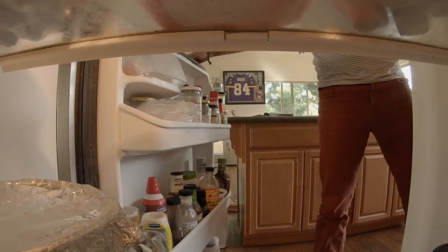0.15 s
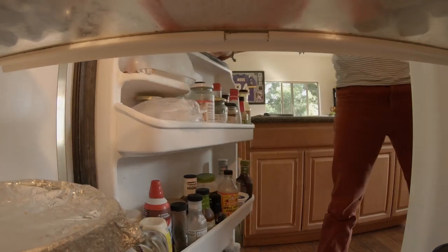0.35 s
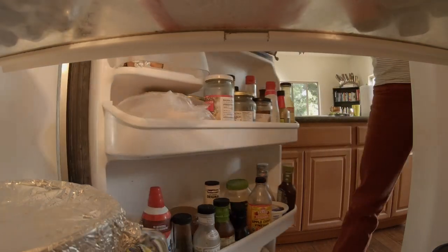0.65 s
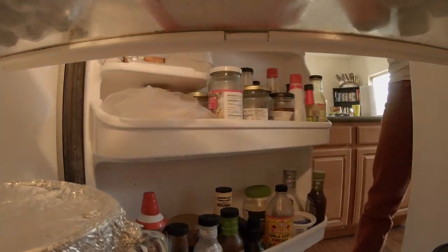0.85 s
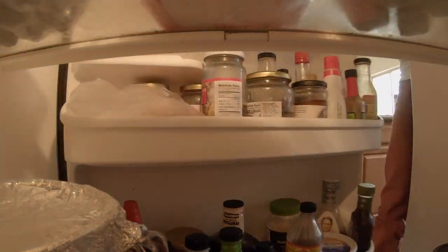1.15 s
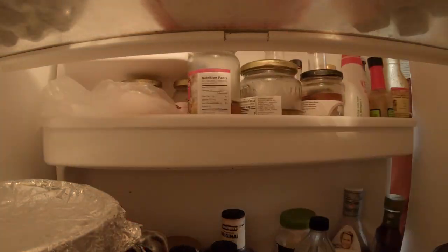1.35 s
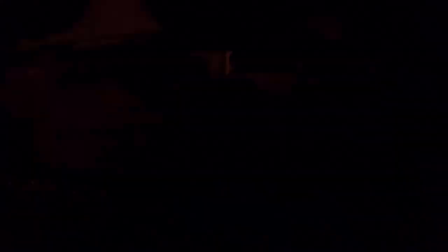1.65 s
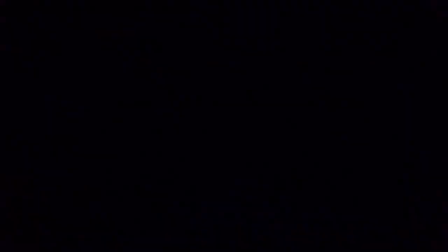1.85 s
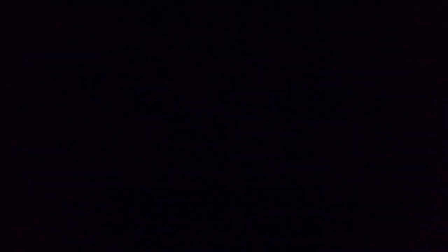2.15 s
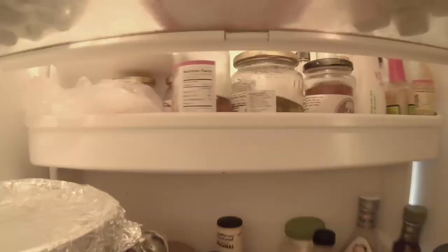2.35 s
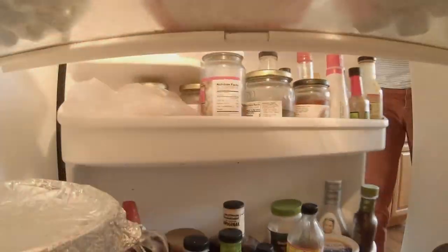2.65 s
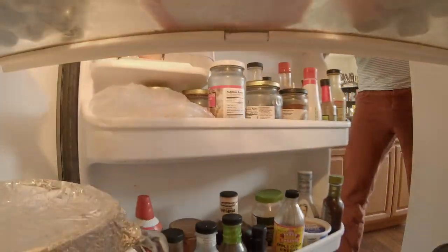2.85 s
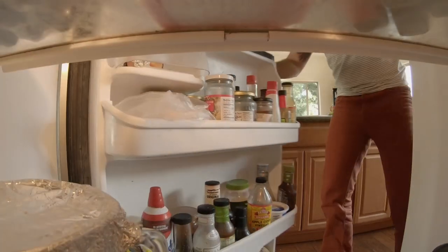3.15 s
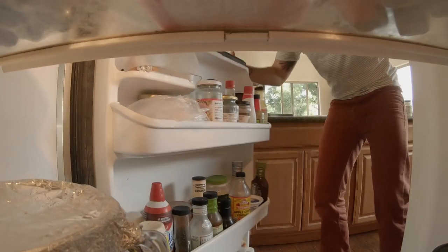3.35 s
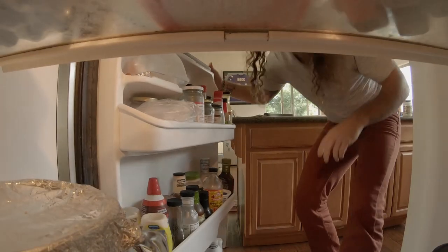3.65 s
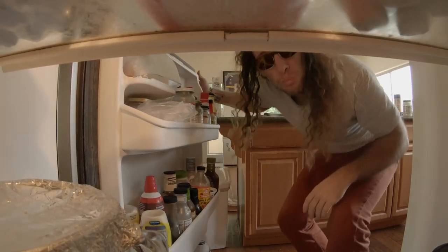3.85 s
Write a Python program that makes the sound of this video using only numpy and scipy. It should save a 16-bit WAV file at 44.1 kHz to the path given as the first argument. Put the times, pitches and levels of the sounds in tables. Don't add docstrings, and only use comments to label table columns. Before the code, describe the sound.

A refrigerator door slams shut with a thump and rattling jars, over a low fridge hum.

```python
import sys
import numpy as np
from scipy import signal
from scipy.io import wavfile
from scipy.ndimage import uniform_filter1d

SR = 44100
rng = np.random.default_rng(int(sys.argv[2]) if len(sys.argv) > 2 else 0)


def boost_factor(decibels):
    exponent = np.asarray(decibels, float) / 20
    return 10 ** exponent


def file_out(sig):
    cols = np.atleast_2d(sig).T
    lim = np.clip(cols, -1, 1)
    pcm = np.round(lim * 32767).astype(np.int16)
    wavfile.write(sys.argv[1], SR, pcm)


N = 176400
T = np.arange(N) / SR

# time in seconds, level in dB, wind mode share from 0 to 1.
AIR = [
    (0, 0, 0.08),
    (.8, 0.5, 0.07),
    (1.5, 0.5, 0.15),
    (1.9, 6.5, 0),
    (2.12, -9.5, 0.26),
    (2.45, -7.5, 0.73),
    (2.75, -4, 0.96),
    (3.45, -2.5, 1),
    (4, -3, 0.74),
]


def evened(x):
    return x / np.sqrt(np.mean(x ** 2) + 1e-20)


def read(points, hz):
    f, value = np.transpose(points)
    return np.interp(np.log(hz + 1), np.log(f + 1), value)


def curve(table, t, index):
    times = [row[0] for row in table]
    return np.interp(t, times, [row[index] for row in table])


def drift(rate):
    speeds = np.geomspace(rate / 10, rate, num=12)
    return evened(sum(np.sin(2 * np.pi * (f * T + rng.random())) for f in speeds))


def port_noise(size, field_db):
    # frequency in Hz, likeness from 0 to 1.
    likeness = [(60, .7), (130, .95), (300, .93), (700, .6), (1400, .55), (3100, .66), (6000, .12)]
    # frequency in Hz, lead in radians.
    left_lead = [(60, .3), (340, .1), (950, 1.4), (1460, .9), (1980, 2.0), (2330, .2)]
    # frequency in Hz, left over right in dB.
    left_lean = [(50, 2), (110, -1.5), (400, -5), (700, -4), (1300, -1), (2400, 0)]
    hop = size // 4
    frames = N // hop + 5
    hz = np.fft.rfftfreq(size, 1 / SR)
    a, b, c, d = rng.standard_normal((frames, len(hz), 4)).T
    same = np.clip(read(likeness, hz), 0, 1)[:, None]
    right = a + 1j * b
    left = same * right + np.sqrt(1 - same ** 2) * (c + 1j * d)
    left = left * (boost_factor(read(left_lean, hz)) * np.exp(1j * read(left_lead, hz)))[:, None]
    spectra = np.array([left, right]) * boost_factor(field_db(hz[:, None], np.arange(frames) * hop / SR))
    noise = signal.istft(spectra, nperseg=size, noverlap=size - hop)[1][:, :N]
    return noise * np.sqrt(3 * SR / 2 / size)


def bright_db(hz, t):
    # frequency in Hz, level in dB.
    hand_on_door = [(1500, -15.5), (2300, -1), (2800, -7), (3400, 1.5), (4400, -13.5), (7500, -2.5),
                    (9000, -20), (15000, -39.5)]
    slam = [(500, -24.5), (1500, -7), (2500, -4), (4600, -9.5), (5600, -2.5), (7800, -3), (9500, -18),
            (15500, -38)]
    seal_peel = [(500, -10), (2200, -2.5), (4200, -3), (5200, -5), (8000, -10.5), (9500, -23.5),
                 (15500, -45)]
    clothes = [(2000, -6.5), (4000, 1.5), (8000, -17), (10800, -33), (12500, -16), (15500, -24.5)]
    colours = [read(c, hz) for c in (hand_on_door, slam, seal_peel, clothes)]
    colours = np.hstack([c - 10 * np.log10(np.mean(boost_factor(2 * c))) for c in colours])
    slam_s, peel_s, clothes_s = 1.45, 2.12, 3.3
    return colours[:, np.searchsorted([slam_s, peel_s, clothes_s], t)]


def rattles():
    # start in seconds, bright level in dB, dull part in dB relative to it,
    # hold in seconds, time to fall 60 dB in seconds.
    slam_hits = [(1.5474, -36, 4.5, 0.0067, 0.08), (1.607, -44, -10.5, 0.017, 0.063),
                 (1.622, -33, 4.5, 0.0033, 0.068), (1.6289, -21.5, -6, 0.02, 0.15),
                 (1.686, -39, 8.5, 0.0064, 0.11), (1.7168, -36, 2.5, 0.0066, .15),
                 (1.724, -42.5, 12, .03, 0.1), (1.78, -34.5, -4.5, 0.02, 0.13),
                 (1.824, -39, -6.5, 0.012, 0.066), (1.8425, -32.5, 1, 0.0098, 0.065),
                 (1.867, -36, 1, 0.013, 0.088), (1.907, -45, -13, 0.008, 0.078),
                 (1.928, -39.5, -8, 0.0058, 0.075), (1.9507, -49, -8, 0.005, 0.08),
                 (1.979, -66, 13.5, 0.0095, 0.23), (2.0008, -44, -0.5, 0.0046, 0.047),
                 (2.054, -48, -7.5, 0.00292, 0.052)]
    small_ticks = [
        (1.307, -60.5, -27, 0.0087, 0.082),
        (2.19, -60.5, 2, .022, 0.079),
        (2.2134, -51, -5, 0.0091, .09),
        (2.246, -58.5, 7.5, 0.009, 0.061),
        (2.258, -58.5, 10, 0.014, 0.065),
        (2.2934, -63, 19, 0.011, 0.055),
        (2.5324, -62.5, 9.5, 0.0063, .08),
        (2.801, -71, -18.5, 0.02, 0.15),
        (3.711, -83.5, 24.5, .006, 0.046),
        (3.939, -78.5, 25.5, 0.0087, 0.044),
    ]
    # middle in seconds, level in dB, half length in seconds.
    brushes = [
        (0.858, -57, 0.045),
        (1.491, -71, 0.096),
        (4.0, -67, 0.24),
    ]
    # frequency in Hz, level in dB.
    dull_colour = [(150, -7), (320, 8.5), (800, -0.5), (1600, -5.5), (2900, -14), (4500, -15),
                   (8000, -35.5), (15000, -68)]
    bright = evened(port_noise(512, bright_db))
    dull = evened(port_noise(512, lambda hz, t: read(dull_colour, hz) + 0 * t))
    crackle = boost_factor(1.2 * evened(uniform_filter1d(rng.standard_normal(N), size=90)))
    bright_power, dull_power = np.zeros(N), np.zeros(N)
    for s, db, dull_db, hold, t60 in slam_hits + small_ticks:
        age = np.maximum(T - s, 0)
        fading = np.maximum(age - hold, 0)
        rise = np.minimum(age / (0.001 + 0.3 * hold), 1) ** 2
        bright_power += rise * boost_factor(2 * (db - 60 * fading / t60))
        dull_power += rise * boost_factor(2 * (db + dull_db - 60 * fading / (1.6 * t60)))
    for s, db, half in brushes:
        bright_power += boost_factor(2 * db) * np.exp(-((T - s) / half) ** 2)
    return crackle * (np.sqrt(bright_power) * bright + np.sqrt(dull_power) * dull)


def clinks():
    # start in seconds, level in dB, pitch factor.
    jar_strikes = [
        (1.7448, -29, 1.0),
        (1.7645, -40, 1.0),
    ]
    # frequency in Hz, level in dB.
    jar_modes = [(4064, 0.5), (5825, -1.5), (7176, -8), (7730, 0.5), (9800, -15), (13200, -32.5)]
    # start in seconds, frequency in Hz, level in dB, time to fall 60 dB in seconds.
    panel_rings = [(1.551, 1500, -19.5, 0.057), (1.549, 1910, -26, 0.044), (1.548, 2200, -25, 0.038),
                   (1.552, 2790, -33.5, 0.066), (1.549, 3080, -29, .04), (1.549, 850, -37, 0.064),
                   (1.619, 874, -30.5, 0.14), (1.634, 2144, -22.5, 0.06), (1.639, 1780, -20.5, 0.057),
                   (1.642, 1994, -31.5, 0.061), (1.640, 809, -23, .1), (1.656, 310, -22, 0.087),
                   (1.662, 823, -26.5, 0.077), (1.674, 695, -25, .1), (1.689, 1534, -38.5, 0.069),
                   (1.690, 2725, -31, 0.047), (1.722, 588, -33, 0.11), (1.728, 842, -28.5, 0.15),
                   (1.727, 1380, -36.5, 0.1), (1.728, 314, -25.5, 0.16), (1.746, 2740, -36, 0.077),
                   (1.788, 2770, -35, 0.11), (1.805, 750, -35.5, .12), (1.821, 1153, -42, .2),
                   (1.844, 813, -25, 0.041), (1.844, 315, -20, 0.075), (1.871, 1290, -37, 0.052),
                   (1.870, 676, -37, 0.19), (1.894, 397, -28, 0.062), (1.912, 786, -38, 0.19),
                   (1.981, 715, -36.5, 0.06), (2.001, 425, -31.5, 0.047), (2.002, 750, -45, 0.081),
                   (2.002, 1570, -58, .05), (2.054, 750, -46, .06), (2.2154, 5500, -47.5, .03),
                   (2.2165, 2440, -50, 0.027), (2.2975, 2060, -39.5, 0.035), (2.304, 1260, -45, 0.055),
                   (2.304, 500, -40, .07), (2.806, 6770, -67.5, .06), (1.555, 1650, -27, 0.049)]
    jar_t60_s, rise_s = 0.061, 0.001
    lowest_hz = jar_modes[0][0]
    glass = []
    for s, db, pitch in jar_strikes:
        for hz, mode_db in jar_modes:
            glass.append((s, hz * pitch, db + mode_db, jar_t60_s * np.sqrt(lowest_hz / hz)))
    twins = [(s, hz * 1.035, db - 5, t60) for s, hz, db, t60 in panel_rings]
    out = np.zeros((2, N))
    age = T[:SR // 4]
    for s, hz, db, t60 in glass + panel_rings + twins:
        ring = boost_factor(db - 60 * age / t60) * (1 - np.exp(-age / rise_s))
        port_phase = rng.uniform(0, np.pi, (2, 1))
        at = round(s * SR)
        out[:, at:at + len(age)] += ring * np.sin(2 * np.pi * hz * age + port_phase)
    return out


def blows():
    # start in seconds, level in dB, frequency in Hz, rise in seconds, sign of the pressure.
    pressure_swings = [(1.5547, -25.5, 262, 0.0052, -1), (1.602, -16.5, 13, 0.0099, 1),
                       (1.6255, -19, 45, 0.0048, -1), (1.6427, -7.5, 36, 0.01, -1),
                       (1.6542, -30, 290, 0.025, 1), (1.7176, -14, 28.8, 0.026, -1),
                       (1.843, -15, 126, .013, -1), (1.894, -14, 121, .013, 1), (1.997, -23, 121, .016, -1),
                       (2.276, -26.5, 34, 0.014, -1), (2.2991, -43, 580, 0.0063, 1)]
    out = np.zeros(N)
    for s, db, hz, rise, sign in pressure_swings:
        age = np.maximum(T - s, 0)
        swell = age / rise * np.exp(1 - age / rise)
        out += np.sign(sign) * boost_factor(db) * swell * np.sin(2 * np.pi * hz * age)
    return out * boost_factor(np.array([[-2.3], [0]]))


def motor():
    # time in seconds, shaft lines in dB, beating buzz in dB.
    motor_level = [
        (0, -29.5, -29),
        (1.0, -31, -27),
        (1.55, -30, -25),
        (1.62, -28.5, -32),
        (1.95, -23, -36),
        (2.15, -40, -47.5),
        (2.3, -49, -48.5),
        (2.7, -43.5, -47.5),
        (2.95, -53, -45),
        (4, -53, -41.5),
    ]
    # frequency in Hz, level in dB, left over right in dB.
    shaft_lines = [(29.9, -13, -1), (48.4, 0, 1), (86.2, -14, 2), (145.3, -7, 1)]
    # frequency in Hz, level in dB, phase in radians.
    buzz_lines = [(113.1, -9, -1.1), (117.46, 1, 0.9), (120.06, -2.5, -1.73)]
    # time in seconds, left in dB, right in dB.
    shake = [
        (0, -28.5, -49),
        (.95, -27.5, -37),
        (1.3, -25, -26.5),
        (1.6, -39.5, -20.5),
        (2.0, -44, -38.5),
        (2.6, -41.5, -34),
        (2.85, -45.5, -48.5),
    ]
    # multiple of the turn, level in dB.
    overtones = [(11, -68.5), (12, -65), (13, -71), (14, -64.5), (23, -70.5), (33, -79), (46, -78.5),
                 (47, -75.5)]
    out = np.zeros((2, N))
    for hz, db, left_db in shaft_lines:
        phase = 2 * np.pi * (hz * T + rng.random()) + 0.089 * drift(1.3)
        level = boost_factor(curve(motor_level, T, index=1) + db + 1.1 * drift(3.5))
        out += level * boost_factor(np.array([[left_db], [0]])) * np.sin(phase)

    buzz = np.zeros(N)
    for hz, db, phase in buzz_lines:
        buzz += boost_factor(db + 2.5 * drift(8.2)) * np.cos(2 * np.pi * hz * T + phase + 0.28 * drift(3.8))
    out += boost_factor(curve(motor_level, T, index=2)) * np.array([boost_factor(-3) * buzz, buzz])

    turn = 2 * np.pi * 58.59 * T
    shake_db = np.array([curve(shake, T, index=1), curve(shake, T, index=2)])
    out += boost_factor(shake_db) * np.sin(turn + np.array([[0.8], [0]]))
    level_db = curve(AIR, T, index=1) - 6.9 * curve(AIR, T, index=2)
    for multiple, db in overtones:
        level = boost_factor(db + level_db + 2.2 * drift(6))
        out += level * np.sin(round(multiple) * turn + rng.uniform(0, np.pi / 2, (2, 1)))
    return out


def air():
    # frequency in Hz, level in dB per Hz.
    two_mic_colour = [(20, -56.5), (190, -61.5), (250, -66), (450, -81), (1500, -93), (3600, -101),
                      (8000, -109), (13000, -129)]
    wind_mode_colour = [(30, -63.5), (190, -62), (330, -73), (450, -88.5), (1500, -96), (4600, -105),
                        (6500, -128), (15000, -145)]
    resonance_hz = [148, 168, 292, 490, 700, 1110, 1285, 1478, 2370, 2750, 3205, 7400, 4600]
    # width in Hz, boost in dB with the door near, boost in dB in wind mode.
    resonance_shape = [(15.37, 8, 10), (20.7, 8.5, 14), (20.9, 14, 14.5), (39.4, 3.5, 11.5),
                       (141, 2.5, 1.5), (62.7, 13, -0.5), (50.3, 5, 10.5), (70, 8, 2), (71.6, 9, 5),
                       (120, 6, -8.5), (81, 12.5, -3), (900, 8, -10), (1500, -4, 0)]

    def field_db(hz, t):
        share = np.clip(curve(AIR, t, index=2), 0, 1)
        db = (1 - share) * read(two_mic_colour, hz) + share * read(wind_mode_colour, hz)
        for f, (width, near_db, wind_db) in zip(resonance_hz, resonance_shape):
            boost = (1 - share) * near_db + share * wind_db
            db = db + boost / (1 + (2 * (hz - f) / width) ** 2)
        return db + curve(AIR, t, index=1)

    return port_noise(4096, field_db)


def scene():
    return rattles() + clinks() + blows() + motor() + air()


def band_limit(x):
    return signal.sosfilt(signal.butter(12, 15730, fs=SR, output="sos"), x)


def record(dry):
    # time in seconds, left port in dB, share of the right port in the left channel.
    mixing = [
        (1.74, 0, 0),
        (1.82, -7, -.5),
        (1.87, -10, -.7),
        (2.05, -12, -.65),
        (2.17, -15, .55),
        (2.4, -22, .72),
        (2.68, -30, .88),
        (2.8, -69, 1),
        (3.86, -69, 1),
        (3.93, -22, 1),
    ]
    left = boost_factor(curve(mixing, T, index=1)) * dry[0] + curve(mixing, T, index=2) * dry[1]
    fade_in = np.minimum(T * SR / 200, 1)
    return band_limit(np.array([left, dry[1]]) * fade_in)


dry = scene()
out = record(dry)
file_out(out)
```